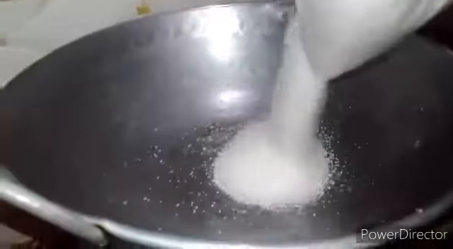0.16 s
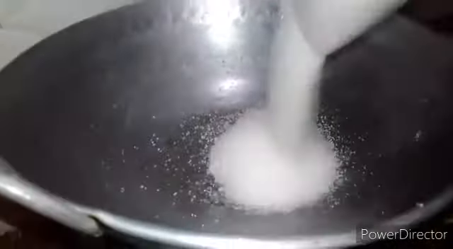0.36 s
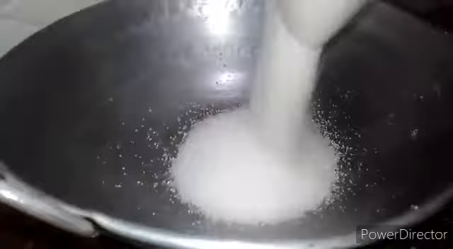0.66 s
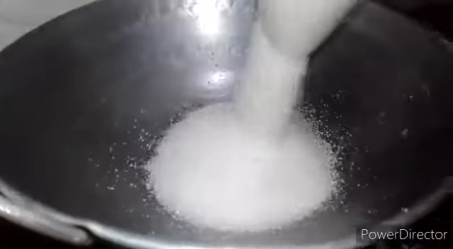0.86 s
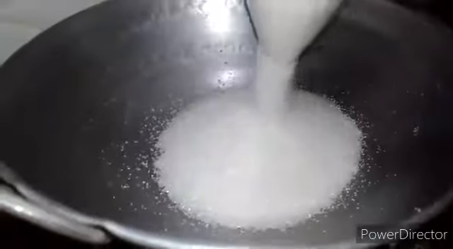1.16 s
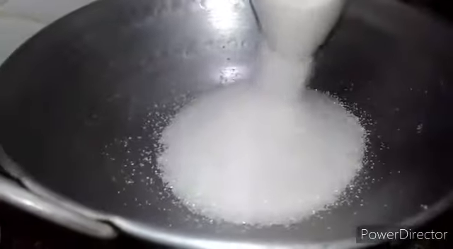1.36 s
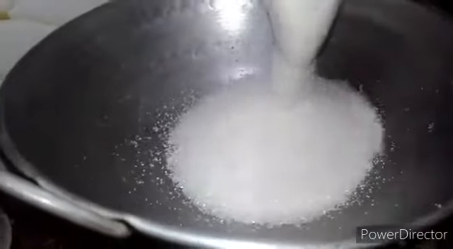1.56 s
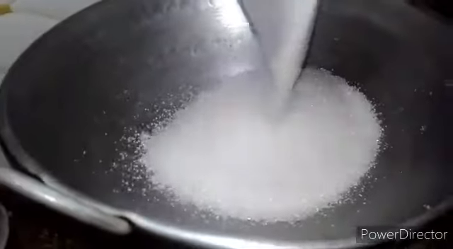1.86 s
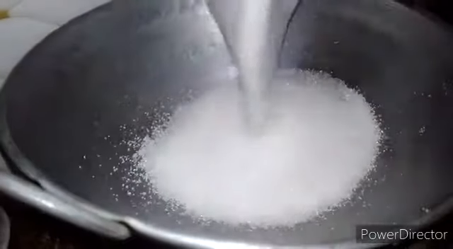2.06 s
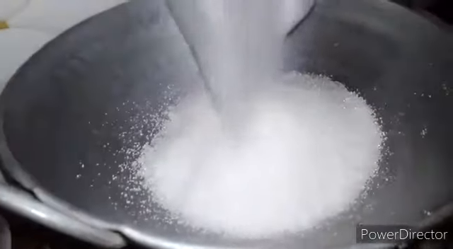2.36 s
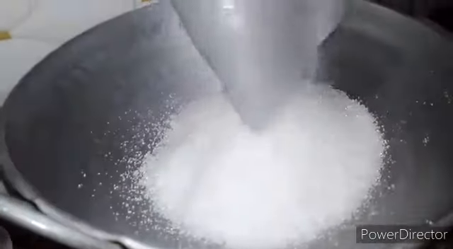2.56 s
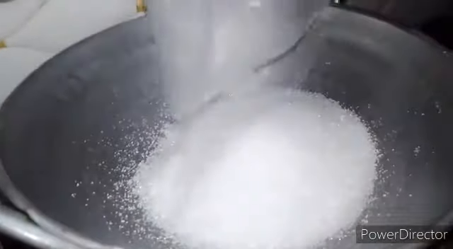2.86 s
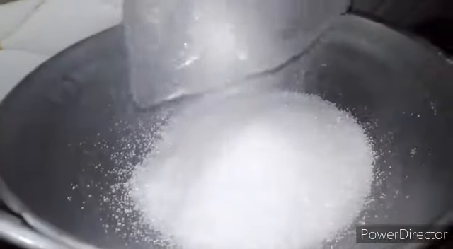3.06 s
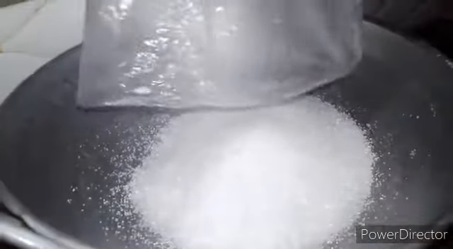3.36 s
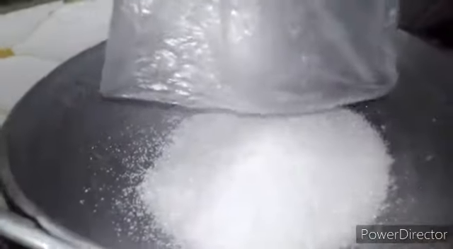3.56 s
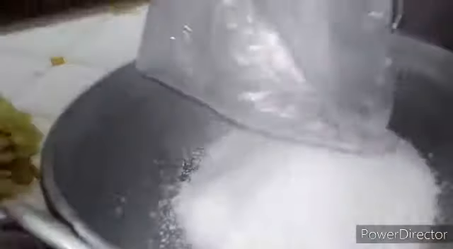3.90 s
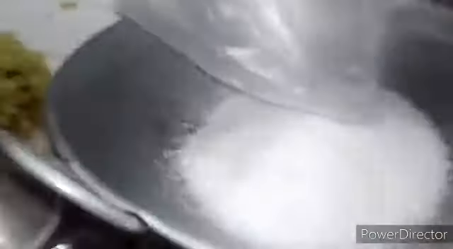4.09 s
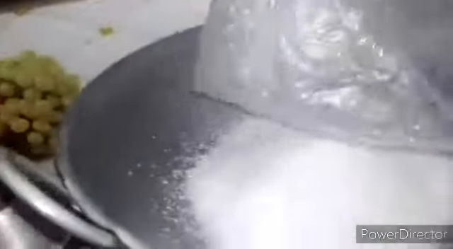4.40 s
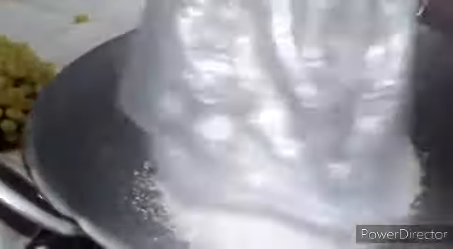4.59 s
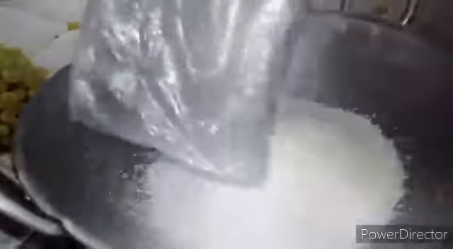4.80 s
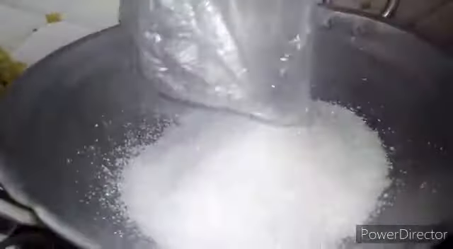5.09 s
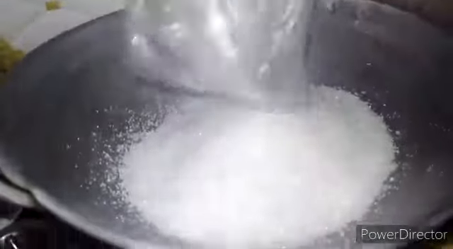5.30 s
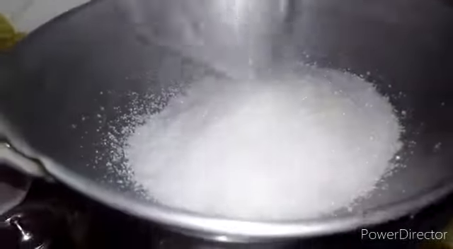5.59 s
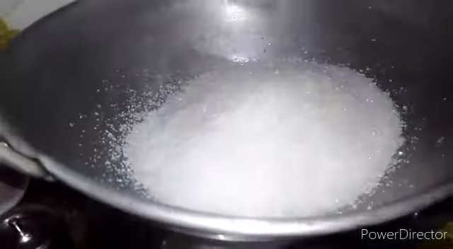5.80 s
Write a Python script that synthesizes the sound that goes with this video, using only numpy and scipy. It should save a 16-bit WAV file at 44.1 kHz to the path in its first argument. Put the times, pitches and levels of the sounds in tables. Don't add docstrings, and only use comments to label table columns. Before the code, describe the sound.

Granulated sugar hisses in a bright stream into a wide metal pan, then the emptied thin plastic bag is shaken with crisp crinkles and snaps.

```python
import sys
import numpy as np
from scipy import signal
from scipy.fft import rfft, irfft
from scipy.io import wavfile
from scipy.ndimage import uniform_filter1d

SR = 44100
rng = np.random.default_rng(int(sys.argv[2]) if len(sys.argv) > 2 else 0)


def transcribe(signal):
    frames = np.atleast_2d(signal).T
    limited = np.clip(frames, -1, 1)
    pcm = np.round(limited * 32767).astype(np.int16)
    wavfile.write(sys.argv[1], SR, pcm)


def to_linear_factor(level_db):
    exponent = np.asarray(level_db, float) / 20
    return 10 ** exponent


N = 262161

# frequency in Hz, level in dB per Hz.
TICK_COLOUR = [(1500, -22), (3500, -6), (6000, 0.5), (9000, 3.5), (12000, 0), (15000, -4.5)]
# frequency in Hz, level in dB per Hz.
PUFF_COLOUR = [(20, -37), (40, -13), (65, -3), (150, -3), (300, -6.5), (600, -19.5)]

DEEP_PER_FLOW, DEEP_PER_TUG = -0.2, 0.74


def colour(x, points):
    hz, db = np.transpose(points)
    size = 4096
    log_hz = np.log(np.arange(size // 2 + 1) * SR / size + 1)
    gain_db = np.interp(log_hz, np.log(hz), db, left=db[0] - 20, right=db[-1] - 20)
    cepstrum = irfft(np.log(to_linear_factor(gain_db)))
    cepstrum[1:size // 2] *= 2
    cepstrum[size // 2 + 1:] = 0
    response = irfft(np.exp(rfft(cepstrum)))
    response = response / np.sqrt(np.sum(response ** 2))
    return signal.fftconvolve(x, response[None], axes=1)[:, :N]


def ring(x, hz, width, db):
    return to_linear_factor(db) * signal.lfilter(*signal.iirpeak(hz, hz / width, SR), x)


def walk(rate):
    hold = int(SR / rate)
    held = np.repeat(rng.standard_normal(N // hold + 1), hold)
    return 1.3 * uniform_filter1d(uniform_filter1d(held, hold), hold)[:N]


def grains(per_s, spread_db):
    hit = rng.random((3, N)) < per_s / SR
    size = to_linear_factor(spread_db * rng.exponential(size=(3, N)))
    swarm = hit * rng.standard_normal((3, N)) * size
    return swarm / np.sqrt(np.mean(swarm ** 2))


def ports(swarm, alike, alike_hz):
    hz = np.fft.rfftfreq(N, 1 / SR)
    share = np.clip(alike, 0, 1) / (1 + (hz / alike_hz) ** 2)
    common, left, right = rfft(swarm)
    shared, own = np.sqrt(share) * common, np.sqrt(1 - share)
    return irfft([shared + own * left, -shared + own * right], N)


def struck(rows, length_s):
    envelope = np.zeros((2, N))
    t = np.arange(int(0.3 * SR)) / SR
    for (s, db, pan_db), length in zip(rows, length_s):
        i = int(s * SR)
        level = to_linear_factor([[db + pan_db / 2], [db - pan_db / 2]])
        envelope[:, i:i + len(t)] += (level * np.exp(-t / length))[:, :N - i]
    return envelope


def panned(x, pan_db):
    return x * to_linear_factor(np.array([[0.5], [-0.5]]) * pan_db)


def kitchen():
    # frequency in Hz, level in dB per Hz.
    room_colour = [(25, -14), (60, -6), (500, -14), (2000, -14), (5000, -12), (9000, -7), (14500, -12)]
    noise = ports(rng.standard_normal((3, N)), 0.68, 2500)
    return to_linear_factor(-48 - 2.5 + 1.0 * walk(4.7)) * colour(noise, room_colour)


def air_puffs():
    # start in seconds, peak level in dB, length in seconds.
    puff_rows = [
        (0.079, -56, 0.041),
        (1.48, -38, 0.015),
        (3.272, -68, 0.037),
        (3.9, -54, .08),
        (4.153, -41, 0.027),
        (4.502, -46, 0.047),
        (4.319, -42.5, 0.081),
        (5.715, -42.5, 0.037),
    ]
    rows = np.array(puff_rows)
    push = uniform_filter1d(struck(rows * [1, 1, 0], rows[:, 2]), 600, axis=1)
    noise = ports(rng.standard_normal((3, N)), 0.62, 2500)
    return to_linear_factor(-2.5) * push * colour(noise, PUFF_COLOUR)


def plastic_snaps():
    # time in seconds, peak level in dB, left minus right in dB.
    snap_rows = [(3.97, -11, -1), (4.0173, -1.5, -5), (4.0574, -15, -10), (4.0634, -9, -3.5),
                 (4.0684, -13, 3), (4.369, -12, -6), (4.428, -13, 1), (4.581, -9, -14.5), (4.6404, -13, -3),
                 (5.175, -17, 1), (5.2294, -9, -7), (5.458, -19, -2), (5.4864, -18, 5), (5.5184, -11, 8),
                 (5.5867, -13, -8), (5.6114, -23, -4), (5.7094, -17, -1), (5.8586, -20, 20),
                 (5.9344, -20.5, -20)]
    # frequency in Hz, level in dB per Hz.
    snap_colour = [(800, -34), (3500, -26), (5500, -9.5), (10000, 1), (15000, -14)]
    crack = struck(snap_rows, np.full(len(snap_rows), 1 / SR))
    rattle = struck(snap_rows, np.full(len(snap_rows), 0.003)) * rng.standard_normal((2, N))
    return colour(to_linear_factor(-0.5) * crack + to_linear_factor(-18.0) * rattle, snap_colour)


def tugged(crinkle, folds, pocket, flap):
    # peak in seconds, crinkle in dB, rise in seconds, fall in seconds, fullness in dB.
    tugs = [(3.76, -36, 0.1, 0.15, -0.5), (3.91, -27.5, 0.17, 0.15, -1.5), (4.121, -22, 0.096, 0.12, 0),
            (4.28, -29.5, 0.049, 0.07, -2), (4.39, -28, 0.088, 0.11, -.5), (4.54, -34, 0.044, 0.043, -2),
            (4.598, -33, 0.027, 0.053, 1.5), (4.68, -25, 0.061, 0.09, 1.5), (4.88, -21.5, 0.17, 0.22, .5),
            (5.02, -26, .08, 0.084, 1), (5.191, -28.5, 0.13, 0.081, -2), (5.29, -33, 0.025, 0.026, -7.5),
            (5.34, -47, .03, 0.031, -2), (5.415, -31.5, 0.0089, .04, -3.5), (5.498, -29, 0.044, .05, 0),
            (5.56, -34.5, 0.027, 0.027, -5), (5.6, -29.5, 0.019, 0.058, 0.5),
            (5.71, -30, 0.063, 0.057, 1.5), (5.85, -36, 0.075, 0.093, -1), (5.93, -35.5, 0.052, .04, -5.5)]
    # time in seconds, left minus right in dB.
    bag_place = [(3.7, 1), (4.3, -1), (4.9, 0), (5.15, 3), (5.42, 4), (5.6, 4), (5.94, .5)]
    folds_db, pocket_db, flap_db = -11.5, -25, -46
    t = np.arange(N) / SR
    s, db, rise, fall, full = np.transpose(tugs)[:, :, None]
    distance = np.abs((t - s) / np.where(t < s, rise, fall))
    power = to_linear_factor(2 * (db - 10 * distance ** 2.34))

    def swell(per_full):
        return np.sqrt(np.sum(power * to_linear_factor(2 * per_full * full), axis=0))

    pocket_swell = swell(0.99)
    body = panned(folds, -6.5) * swell(1) * to_linear_factor(folds_db) + pocket * pocket_swell * to_linear_factor(pocket_db)
    hanging = panned(crinkle * swell(0) + body, np.interp(t, *np.transpose(bag_place)))
    return hanging + flap * pocket_swell ** DEEP_PER_TUG * to_linear_factor(flap_db)


def bag():
    # frequency in Hz, level in dB per Hz.
    fold_colour = [(500, -32), (1300, -3), (2100, -1.5), (3300, -1), (4500, -0.5), (8000, -0.5)]
    # frequency in Hz, width in Hz, level in dB.
    panel_modes = [(1910, 115, -4), (2274, 370, -1.5), (2815, 220, -2), (3284, 190, 2.5), (3860, 260, -2.5),
                   (4820, 300, -11.5)]
    # frequency in Hz, level in dB per Hz.
    pocket_colour = [(120, -22.5), (250, -12), (450, -7), (700, -4), (950, 3), (1200, -16.5), (2500, -5.5)]
    bursts = 0.8 * walk(22) + 0.6 * walk(90)
    crinkle = colour(ports(grains(16000, 1.1), 0.6, 2500), TICK_COLOUR) * to_linear_factor(-2.5 + bursts)
    crease = ports(grains(9000, 0.95), 0.58, 2400)
    panels = sum(ring(crease, hz, width, db) * to_linear_factor(3.0 * walk(14)) for hz, width, db in panel_modes)
    folds = colour(crease + panels, fold_colour) * to_linear_factor(2.5 + bursts + 0.42 * walk(29))
    pocket = colour(ports(grains(4300, 1.4), 0.69, 2100), pocket_colour) * to_linear_factor(7.0 + 1.6 * walk(14))
    flap = colour(ports(grains(300, 1.4), 0.67, 2500), PUFF_COLOUR) * to_linear_factor(7.5 + 1.3 * walk(42))
    return tugged(crinkle, folds, pocket, flap) + plastic_snaps()


def poured(ticks, slide, thud, rock):
    # time in seconds, flow in dB, slip of the heap in dB.
    stream = [(0.0, -20.5, -3), (0.15, -27.5, 0.5), (0.29, -30, 2), (0.55, -30.5, 1.5), (0.68, -26.5, -1),
              (1.05, -23.5, -4), (1.19, -23.5, 4.5), (1.42, -19.5, 3.5), (1.6, -12.5, 0.5),
              (1.76, -15.5, 1), (1.91, -18.5, -1), (2.13, -14, -1), (2.62, -16.5, -.5), (2.72, -20, 0.5),
              (2.9, -21, 2.5), (3.41, -25, -0.5), (3.62, -30.5, -3), (3.7, -41.5, -4)]
    slide_db, thud_db, rock_db = -9.5, -27.5, -40.5
    t = np.arange(N) / SR
    s, flow, slip = np.transpose(stream)
    flow_db, slip_db = np.interp(t, s, flow), np.interp(t, s, slip)
    deep_db = DEEP_PER_FLOW * (flow_db + 19.5)
    sliding = panned(slide, -0.8 - 0.91 * t) * to_linear_factor(slide_db + slip_db)
    thudding = thud * to_linear_factor(thud_db + 0.98 * slip_db + deep_db)
    rocking = rock * to_linear_factor(rock_db + slip_db + deep_db)
    falling = panned(ticks, 0.5 - 0.12 * (flow_db + 23.5))
    last_crystals = np.clip(1 - (t - s[-1]) / 0.03, 0, 1)
    return (falling + sliding + thudding + rocking) * to_linear_factor(flow_db) * last_crystals


def sugar():
    # frequency in Hz, width in Hz, level in dB.
    pan_modes = [(1402, 85, -23.5), (3000, 150, -31), (3526, 51, -31.5), (3540, 20, -43), (5000, 88, -44)]
    # frequency in Hz, level in dB per Hz.
    slide_colour = [(400, -20.5), (1000, -11.5), (2000, -1.5), (3000, 0), (4500, -2), (8000, -10)]
    # frequency in Hz, level in dB per Hz.
    thud_colour = [(120, -46), (250, -9.5), (450, -8.5), (700, -4), (1000, 0), (2200, -13)]
    slips = 0.75 * walk(18) + 0.4 * walk(45)
    impacts = ports(grains(20000, 1.0), 0.27, 1900)
    ticks = colour(impacts, TICK_COLOUR) * to_linear_factor(-4.0 + slips + 0.52 * walk(13))
    rub = ports(grains(14000, 1.2), 0.85, 2700)
    modes = sum(ring(rub, hz, width, db + 20) * to_linear_factor(2.5 * walk(10)) for hz, width, db in pan_modes)
    slide = colour(rub + modes, slide_colour) * to_linear_factor(3.0 + slips + 0.93 * walk(12))
    tumble = ports(grains(6000, 1.5), 0.88, 2500)
    thud = colour(tumble, thud_colour) * to_linear_factor(9.0 + 0.42 * walk(19))
    rock = colour(ports(grains(400, 1.1), 0.79, 2500), PUFF_COLOUR) * to_linear_factor(8.5 + 1.3 * walk(18))
    return poured(ticks, slide, thud, rock)


def scene():
    return kitchen() + air_puffs() + bag() + sugar()


def starve(pair, shares):
    hz, _, cells = signal.stft(pair, SR, nperseg=1536, noverlap=1024)
    bins = np.arange(len(hz))
    band = np.cumsum(bins % 9 == 0) + np.minimum(bins, 30) // 3
    power = uniform_filter1d(np.abs(cells) ** 2, size=5, axis=2) + 1e-18
    luck_db = 11 * uniform_filter1d(rng.standard_normal(power.shape), size=5, axis=2)
    for channel, share in enumerate(shares):
        for b in np.unique(band[share > 0]):
            inside = band == b
            relative = power[channel, inside].sum(0) / power.sum((0, 1))
            strength = relative * to_linear_factor(2 * luck_db[channel, b])
            muted = strength < np.quantile(strength, share[inside].mean())
            cells[channel][np.ix_(inside, muted)] *= 0.01
    return signal.istft(cells, SR, nperseg=1536, noverlap=1024)[1][:, :N]


def phone_gaps(heard):
    # frequency in Hz, then the share muted (0-1) of the sum, of the difference, of each channel.
    gap_shares = [(40, .1, 0, 0), (200, .2, .005, 0), (650, .18, .005, 0), (1000, .01, 0, 0),
                  (1900, .02, .005, .005), (2300, .09, .01, .02), (2800, .09, .01, .04),
                  (3600, .06, .02, .045), (4600, .04, .03, .035), (5400, .02, .02, .015), (6200, 0, 0, 0)]
    hz, *shares = np.transpose(gap_shares)
    total, difference, each = (np.interp(np.fft.rfftfreq(1536, 1 / SR), hz, s) for s in shares)
    turn = np.array([[1, 0.98], [1, -0.93]]) / np.sqrt(2)
    sum_and_difference = starve(turn @ heard, (total, difference))
    return starve(turn @ sum_and_difference, (each, each))


def band_limit(x):
    return signal.sosfilt(signal.butter(12, 14340, fs=SR, output="sos"), x)


def record(dry):
    # frequency in Hz, width in Hz, level in dB.
    cavities = [(9880, 1440, 8), (8270, 4200, 2)]
    heard = np.array([x + ring(x, hz, width, db) for x, (hz, width, db) in zip(dry, cavities)])
    heard = 1.353 * np.tanh(heard / 1.151)
    return band_limit(phone_gaps(heard))


dry = scene()
out = record(dry)
transcribe(out)
```